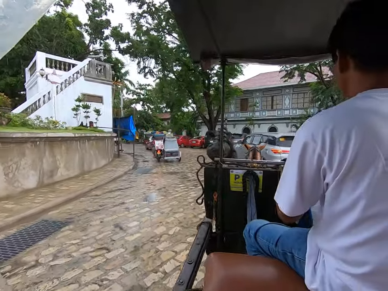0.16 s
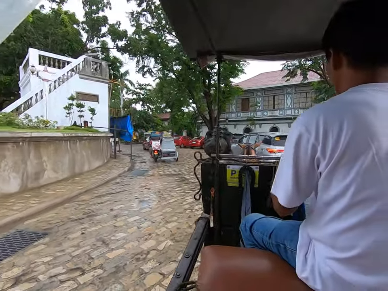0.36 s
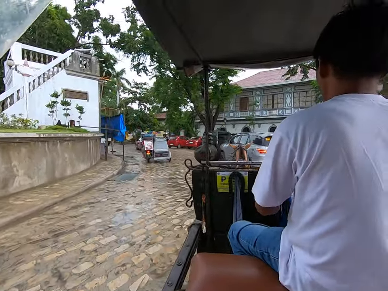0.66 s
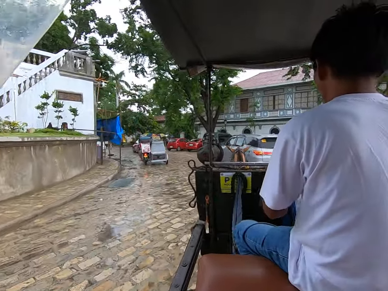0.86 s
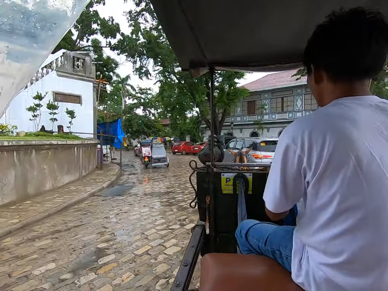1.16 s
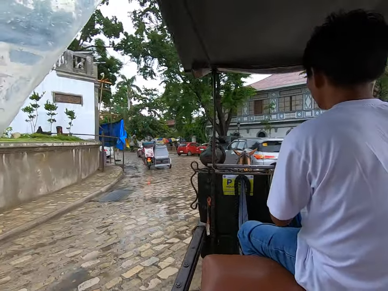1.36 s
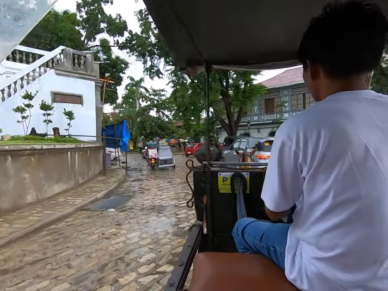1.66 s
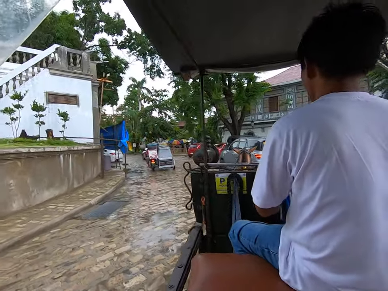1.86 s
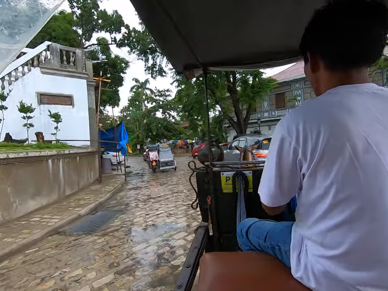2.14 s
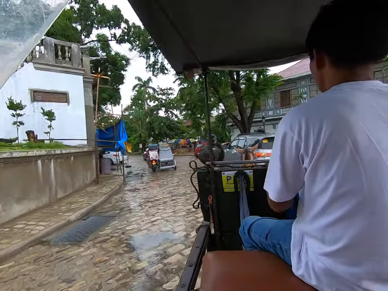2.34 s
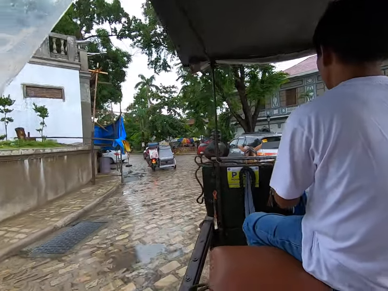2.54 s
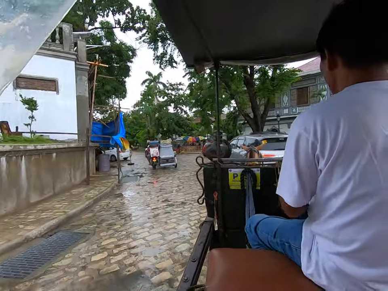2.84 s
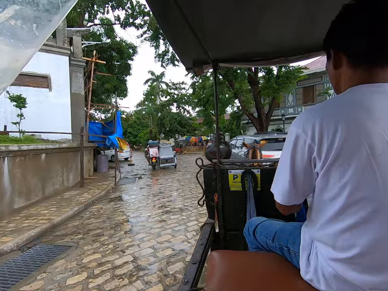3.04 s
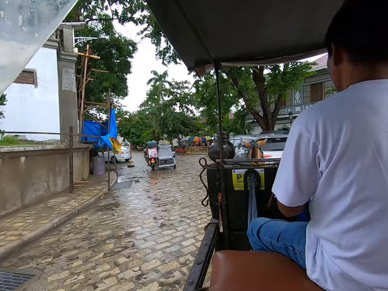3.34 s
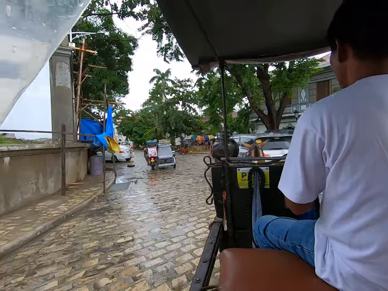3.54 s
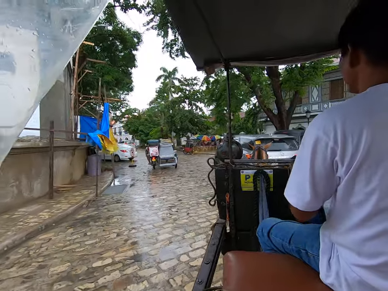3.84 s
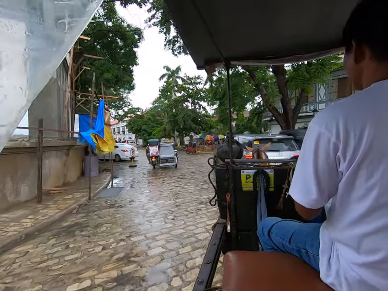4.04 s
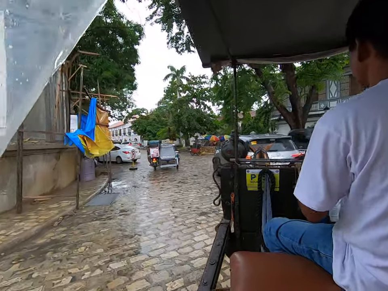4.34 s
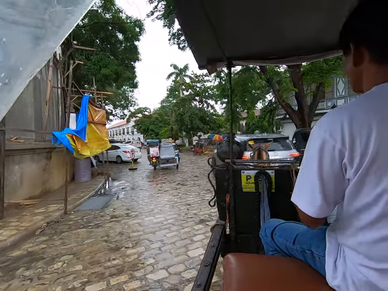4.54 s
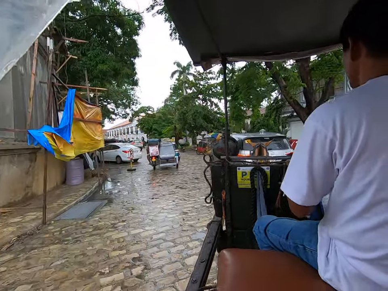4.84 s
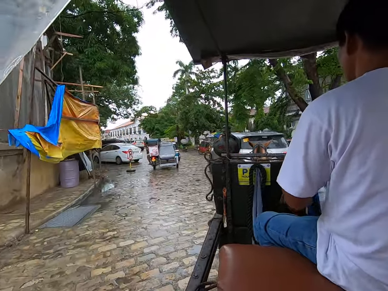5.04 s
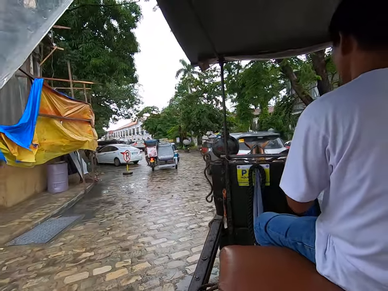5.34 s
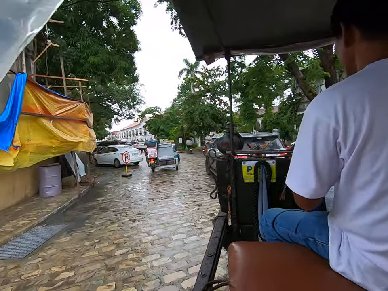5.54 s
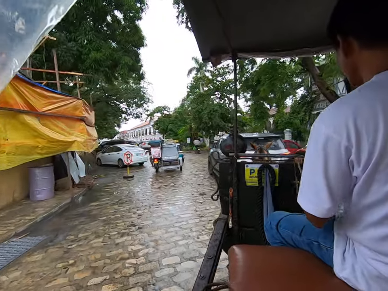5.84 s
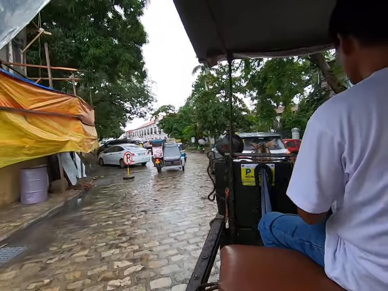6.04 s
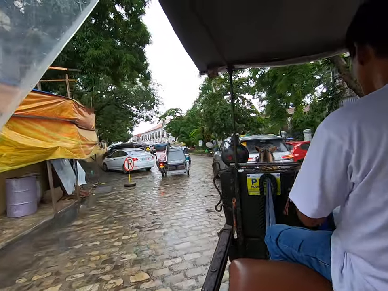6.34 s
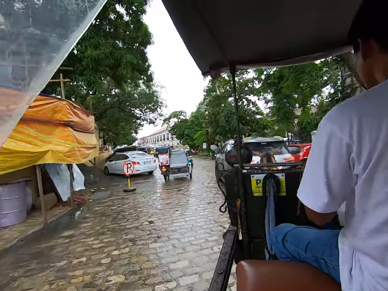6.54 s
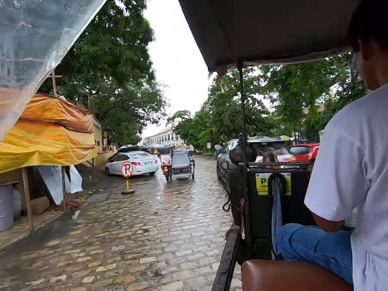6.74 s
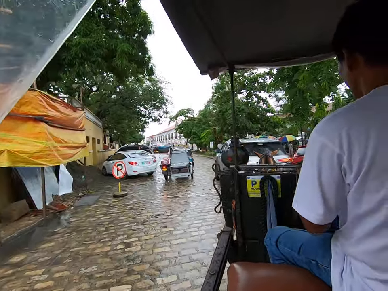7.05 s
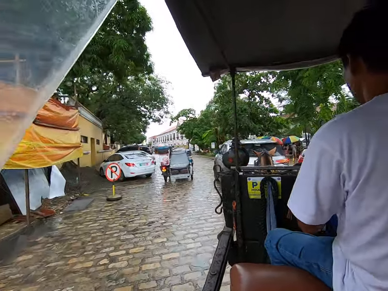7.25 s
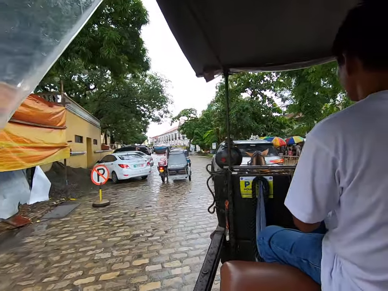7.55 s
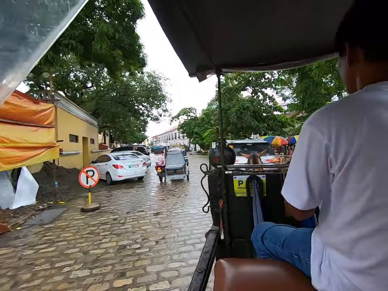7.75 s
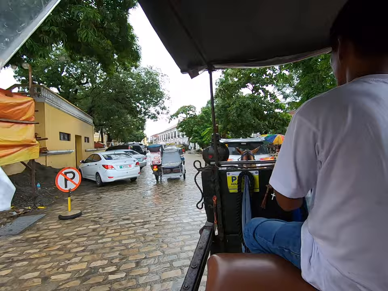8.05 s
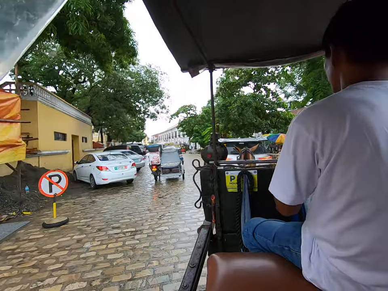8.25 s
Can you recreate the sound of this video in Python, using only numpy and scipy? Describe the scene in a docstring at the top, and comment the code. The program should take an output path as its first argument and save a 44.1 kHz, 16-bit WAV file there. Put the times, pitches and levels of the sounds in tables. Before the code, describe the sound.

A horse trots on a wet cobbled street for about eight seconds, heard from the seat of the cart it pulls. The hooves make hollow, damped clip-clops, a little over three a second, often in quick pairs and varying in strength. Underneath, the cart rumbles steadily and its boards rattle, with scattered wooden knocks, the stronger ones near 0.2, 4.2, 4.9 and 7.1 seconds. Water hisses and spits from the wheels, brightest in the first two seconds, with small splashes around 1.2 and 1.8 seconds. Metal fittings clink lightly, and the harness chain jingles faintly from about 3 to 5.3 seconds. The low pulsing exhaust of a motor tricycle ahead starts faint and slowly grows, strongest from about 6 seconds. The sound begins wide, narrows almost to mono by 3 seconds and partly reopens around 8.

```python
"""A wet cobbled street, heard from the seat of a two-wheeled cart behind a trotting horse.
Each hoof strikes a hollow, damped note from the stone, often in a quick pair. The cobbles force the
cart body to drone, rattle and knock; the harness clinks. Water hisses and spits, brightest in the
first seconds, and the periodic exhaust pulses of a motor tricycle ahead slowly grow louder.
The sound starts wide, narrows almost to mono after two seconds and partly reopens at the very end."""
import sys
import numpy as np
from scipy import signal
from scipy.fft import rfft, irfft
from scipy.io import wavfile
from scipy.ndimage import uniform_filter1d

SR = 44100
rng = np.random.default_rng(int(sys.argv[2]) if len(sys.argv) > 2 else 0)


def digitize_waveform(pressure):
    """Quantize a signal to 16-bit integers and store it at the path in sys.argv[1].

    Rows of a 2-D input are taken as channels; values are limited to [-1, 1].
    """
    field = np.atleast_2d(pressure).T
    bounded = np.clip(field, -1, 1)
    quanta = np.round(bounded * 32767).astype(np.int16)
    wavfile.write(sys.argv[1], SR, quanta)


N = 370440

# Levels are relative within each column; spectra give level per unit bandwidth.
# the trot, diagonal pairs landing almost together: t/s, note/dB, hollow pitch/Hz, crunch/dB, click/dB
HOOFBEATS = [(.213, -31, 1320, -26, -38), (.247, -29, 1017, -21.5, -25), (0.529, -28, 1420, -24, -28.5),
             (.549, -25.5, 1065, -36, -46), (0.852, -12, 1184, -26, -25.5), (1.101, -23, 1380, -23.5, -27),
             (1.119, -37, 1270, -27, -38), (1.392, -33, 1420, -24, -27), (1.426, -14, 1042, -25, -35),
             (1.69, -21, 1360, -20, -23), (1.715, -9.5, 1093, -24, -43), (1.972, -23, 1363, -25, -33),
             (2.008, -16.5, 1094, -18.5, -34), (2.278, -27, 1350, -28, -47), (2.291, -19.5, 998, -30, -43),
             (2.573, -31, 1350, -28.5, -53), (2.601, -25.5, 1023, -23, -38), (2.864, -27, 1530, -32, -39),
             (2.891, -8.5, 977, -27.5, -38), (3.162, -25, 1310, -32, -43), (3.193, -28, 1080, -32, -36),
             (3.455, -36, 1380, -31.5, -36), (3.492, -13, 1310, -20, -33), (3.511, -19, 1210, -38, -52),
             (3.738, -19.5, 1280, -30, -45), (3.78, -18.5, 1110, -25.5, -42), (4.044, -31, 1350, -27, -35),
             (4.064, -16, 1070, -25.5, -39), (4.348, -36, 1410, -30.5, -45), (4.37, -24.5, 1040, -30, -46),
             (4.638, -22.5, 1344, -31, -39), (4.663, -25, 1106, -30, -55), (4.952, -41, 1360, -28, -55),
             (4.978, -26, 1100, -26.5, -42), (5.263, -17, 1100, -30, -47), (5.581, -22.5, 1257, -27.5, -45),
             (5.859, -19, 1135, -31, -49), (5.876, -11.5, 1092, -28, -40), (6.162, -28, 1330, -43, -54),
             (6.19, -11, 1387, -22.5, -35), (6.482, -36, 1245, -29, -49), (6.777, -28, 1285, -28.5, -48),
             (6.809, -20, 1046, -28, -49), (7.094, -24, 1330, -27, -35), (7.114, -20, 1085, -30, -42),
             (7.419, -32, 1040, -28, -50), (7.724, -17.5, 1102, -20.5, -37), (8.033, -21.5, 1440, -21, -47),
             (8.32, -36, 1000, -29.5, -37)]
# modes of the hoof's cup: f/hollow pitch, level/dB, share of the ring time
HOOF_MODES = [(.66, -23.5, 0.82), (0.999, 1.5, 0.86), (1.14, -20, 1), (1.39, -23, 0.21), (2.752, -29, 0.88)]
# modes of iron shoe and stone: f/Hz, level/dB, t60/s
SHOE_MODES = [(712, -9, 0.038), (986, -5, 0.056), (1810, -8, 0.058), (2964, -9, .04)]
# spectrum of the shoe's click: f/Hz, level/dB
CLICK_SPECTRUM = [(600, 7), (1500, 10), (3300, 7), (5000, 3.5), (7500, -0.5), (10000, -10), (11500, -27),
                  (15500, -38)]
# spectrum of the shoe's crunch and scuff: f/Hz, level/dB
CRUNCH_SPECTRUM = [(500, -19.5), (800, -9.5), (1000, -2.5), (1300, 3), (1600, 1), (1950, -18.5),
                   (2400, -17), (3200, -10.5), (5000, -25)]
# reflections from dashboard and canopy: delay/s, left gain, right gain
CART_ECHOES = [(.0083, -.12, 0.29), (0.02, .22, 0.089), (0.024, .06, .18)]
# how hard the paving shakes the cart: t/s, drone/dB, rattle/dB, tyre hiss/dB
SHAKING = [(0, -27.5, -41.5, -37), (.25, -23, -38, -34.5), (1.1, -24, -38.5, -35.5),
           (1.8, -23.5, -39.5, -35), (2.1, -29.5, -44.5, -40.5), (2.45, -22, -35.5, -38),
           (3.25, -21.5, -38.5, -40), (3.9, -23, -37, -40.5), (4.95, -21, -37, -38), (5.7, -21.5, -39, -38),
           (6.251, -20, -36, -37), (6.7, -25.5, -38, -35), (7.5, -21.5, -37.5, -35),
           (8.4, -23.5, -38.5, -35)]
# spectrum of the cart body: f/Hz, level/dB
DRONE_SPECTRUM = [(15, -22), (28, -7), (42, -8.5), (52, -8), (70, -2.5), (95, -1.5), (114, -1.5),
                  (138, -0.5), (172, -15), (245, -16.5), (340, -25.5), (600, -62)]
# spectrum of the boards: f/Hz, level/dB
RATTLE_SPECTRUM = [(120, -46), (220, 8), (290, 4.5), (350, -4), (470, 3.5), (650, -2.5), (800, -6.5),
                   (1100, -4.5), (1500, -12.5), (2100, -21.5), (4000, -43)]
# spectrum of the tyres on wet stone: f/Hz, level/dB
HISS_SPECTRUM = [(500, 1), (1200, 6.5), (2200, 2.5), (3000, 3), (3900, -1), (4800, -9), (5600, -20.5),
                 (8200, -17), (11000, -30), (13000, -27), (15000, -47)]
# spectrum of the wheel spray: f/Hz, level/dB
SPRAY_SPECTRUM = [(700, -10), (2000, 0.5), (4500, 6), (6300, 6), (8200, -1), (10000, -4), (11300, -13.5),
                  (13500, -35), (15700, -31)]
# the cart jolts on a stone: t/s, level/dB, f/Hz
JOLTS = [(0.194, -15, 106), (0.656, -20, 268), (1.155, -22.5, 289), (1.841, -21.5, 399), (2.599, -21, 277),
         (2.805, -25.5, 264), (3.279, -18.5, 294), (3.299, -19.5, 253), (4.2, -13.5, 262.6),
         (4.484, -19.5, 271), (4.916, -12, 136), (5.225, -25.5, 427), (5.365, -28.5, 448),
         (6.321, -23.5, 413), (6.362, -16.5, 296), (7.107, -15.5, 315), (7.241, -22.5, 424),
         (7.883, -26.5, 462)]
# modes of the wooden panels: f/jolt pitch, level/dB, t60/s
PANEL_MODES = [(.72, -0.5, 0.075), (1.0, 6, 0.042), (1.371, -6.5, 0.063), (1.8, -1, 0.026),
               (2.6, -11, 0.042)]
# brightness of the spray hiss and hoof clicks, highest in the first seconds: t/s, brightness/dB
BRIGHTNESS = [(0, -7), (.17, -3.5), (.37, 0.5), (.6, -5.5), (.72, -0.5), (.95, -4.5), (1.35, 1.5),
              (1.5, -2), (1.67, 2.5), (1.85, -2.5), (2.0, -1), (2.1, -6), (2.3, -8), (2.55, -18.5),
              (3.0, -11), (3.13, -22), (3.27, -8.5), (3.4, -19), (3.6, -17), (4.55, -16), (4.9, -10.5),
              (5.3, -8), (5.7, -19.5), (6.15, -11.5), (6.7, -19.5), (7.3, -13.5), (8.15, -19), (8.4, -8)]
# a wheel runs through a puddle: t/s, level/dB
PUDDLES = [(.375, -28), (1.128, -34), (1.154, -20.5), (1.204, -27), (1.293, -36), (1.835, -24.5),
           (2.168, -33), (2.361, -28), (3.22, -34.5), (3.558, -36), (3.896, -30), (4.195, -32),
           (4.702, -31.5), (7.095, -29)]
# spectrum of thrown droplets: f/Hz, level/dB
DROPLET_SPECTRUM = [(800, -5), (2000, 11.5), (4500, 4), (10000, -4), (11300, -13), (14000, -23),
                    (15500, -37)]
# short sharp ticks and snaps, each around one pitch: t/s, level/dB, f/Hz
SNAPS = [(1.153, -22, 4700), (1.835, -28, 8950), (2.167, -28, 6160), (3.558, -34, 4000), (4.195, -36, 7540),
         (4.199, -30, 3100), (4.69, -30, 3050), (5.003, -29, 3560), (5.288, -33, 3550),
         (5.484, -31.5, 3370), (5.602, -29.5, 3450)]
# metal fittings of harness and cart are struck: t/s, level/dB, f/Hz, t60/s
CLINKS = [(.075, -32, 3460, .04), (.612, -30, 3800, .05), (1.118, -27, 3650, .04), (1.664, -30, 3950, 0.06),
          (1.717, -30, 3000, .06), (2.379, -35, 9080, 0.057), (2.42, -38, 7060, 0.035),
          (6.322, -47, 8900, 0.043), (6.36, -51, 9300, .03), (3.523, -33.5, 3490, 0.1),
          (6.659, -51, 4190, 0.52), (7.0, -48, 4170, .6), (7.28, -54, 4190, .6), (8.052, -47.5, 3160, 0.94)]
# the harness chain is shaken: t/s, level/dB
CHAIN_SHAKES = [(2.99, -46), (3.457, -42), (3.485, -47), (3.57, -55), (3.63, -46), (3.745, -51),
                (3.815, -43), (3.852, -41), (3.897, -41), (3.985, -42), (4.055, -44), (4.128, -47),
                (4.39, -50), (4.755, -48), (4.845, -44), (4.893, -42), (5.175, -42), (5.235, -45),
                (5.325, -45)]
# modes of a chain link: f/Hz, level/dB, t60/s
LINK_MODES = [(3380, -11, 0.041), (3800, 3, 0.051), (4620, -2, 0.046), (5180, -4, 0.071)]
# the tricycle's single-cylinder engine: t/s, exhaust/dB, valve tick/dB
ENGINE_LEVELS = [(0, -36, -55), (2.4, -26.5, -58.5), (4.7, -23.5, -55), (5.1, -22, -56),
                 (5.8, -22.5, -56.5), (6.05, -20.5, -49), (6.7, -21, -53.5), (7.1, -21, -50),
                 (7.5, -23, -51.5), (7.85, -22, -47.5), (8.4, -20, -53)]
# engine speed: t/s, firing rate/Hz
FIRING_RATE = [(0, 17.9), (2.4, 20.4), (4.7, 19.4), (5.1, 22.4), (5.56, 22.1), (6.05, 22.45), (6.6, 22.75),
               (7.0, 23.2), (7.4, 23.2), (7.7, 22.2), (8.0, 20.8), (8.4, 19)]
# harmonics of the exhaust: f/firing rate, level/dB
EXHAUST_HARMONICS = [(2, -17), (3, -17.5), (4, -10), (5, -1), (6, 0), (7, -9), (8, -20.5), (10, -19.5),
                     (11, -18.5)]
# reverberation time of the street: f/Hz, t60/s
STREET_DECAY = [(200, 0.26), (1100, 0.2), (4000, 0.32), (12000, 0.49)]
# likeness of the left and right noise: f/Hz, correlation
COHERENCE = [(30, .93), (130, .95), (300, .86), (600, .55), (1200, .33), (3000, .55), (5800, .2),
             (10000, 0)]
# balance of the noise: f/Hz, left minus right/dB
BALANCE = [(30, .4), (3300, .2), (5800, -1.5), (10000, 3.5), (13000, 5.5)]
# change of stereo width, before weighting by band: t/s, width/dB
WIDTH = [(0, 0), (2.25, 0), (2.75, -9), (3.1, -26), (3.5, -40), (7.8, -40), (8.05, -14), (8.4, -8)]
# weight of the width change in each band: f/Hz, factor on width/dB
WIDTH_WEIGHT = [(30, 2.0), (300, 1.6), (1200, 1.1), (4000, .8), (5500, .5), (9500, .5), (11000, .2),
                (12000, 0)]


def hooves():
    """Impact excitation: the shoe clicks and crunches, and the hoof's cup rings in damped modes."""
    out, t = np.zeros((2, N)), np.arange(8192) / SR
    ring_cycles, scuff_lead_s, heel_lag_s, dull_above_hz = 44, .02, .0042, 4200
    weak_modes = [level < -4 for _, level, _ in HOOF_MODES]
    crack = gain_of(.5) * np.exp(-t / .0023)  # the first instant of iron on stone
    click_envelope = (np.exp(-t / .011) + crack) * np.minimum(t / .0007, 1)
    for s, db, hz, crunch_db, click_db in HOOFBEATS:
        t60 = ring_cycles / hz  # constant Q: higher notes die sooner
        detune = 1 + .034 * rng.standard_normal(len(HOOF_MODES)) * weak_modes
        note = sum(gain_of(level) * ring(t, hz * ratio * d, t60 * share, rise=.0016)
                   for (ratio, level, share), d in zip(HOOF_MODES, detune))
        note *= 1 + .35 * flutter(len(t), size=70) * np.minimum(t / .008, 1)  # the shoe chatters
        note = note + [[.7], [-.7]] * signal.hilbert(note).imag  # left and right differ in phase
        shoe = sum(gain_of(level) * ring(t, f * rng.uniform(1, 1.04), shoe_t60, rise=.001)
                   for f, level, shoe_t60 in SHOE_MODES)
        # wheels and paving scatter the note back
        scatter = ring(t, hz, t60=.11, rise=.006) * [flutter(len(t), size=130) for _ in range(2)]
        tilt_db_per_octave = .3 * min(brightness(s), 0)  # the click dulls as the hiss fades
        spectrum = [(f, level + tilt_db_per_octave * np.log2(max(f / dull_above_hz, 1)))
                    for f, level in CLICK_SPECTRUM]
        click = coloured(rng.standard_normal((2, len(t))), spectrum) * click_envelope
        crunch, scuff = scrape(t, decay_s=.012), scrape(t, decay_s=.025)
        blow = gain_of(db + 1) * note + gain_of(click_db - .5) * click
        blow += gain_of(crunch_db - 2.5) * (crunch + shoe)
        add(out, s - scuff_lead_s, gain_of(crunch_db - 12) * scuff)  # the toe grazes first
        add(out, s, blow + gain_of(db - 19) * scatter)
        add(out, s + round(heel_lag_s * hz) / hz, gain_of(db - 9) * note)  # the heel lands in phase
        for delay, left, right in CART_ECHOES:  # the paths change with where the hoof lands
            add(out, s + delay * rng.uniform(.85, 1.15), blow * [[left], [right]])
    return out


def scrape(t, decay_s):
    """Friction of a shoe on stone radiates a burst of rough noise that decays exponentially."""
    noise = coloured(rng.laplace(size=(2, len(t))), CRUNCH_SPECTRUM)
    return noise * np.exp(-t / decay_s) * np.minimum(t / .00028, 1)


def rolling_cart():
    """Forced vibration: the same bumps modulate body drone, board rattle, tyre hiss and spray."""
    t = np.arange(N) / SR
    s, *levels = np.transpose(SHAKING)
    drone_db, rattle_db, hiss_db = (np.interp(t, s, level) for level in levels)
    bumps = wander(per_s=23)
    bright_db = brightness(t) + 1.2 * wander(per_s=14)  # the treble flickers
    body = coloured(rng.standard_normal((2, N)), DRONE_SPECTRUM)
    body /= np.sqrt(uniform_filter1d(body[0] ** 2, size=6000))  # the even run of stones steadies it
    boards = patchy(grains(per_s=2700, spread_db=1), depth_db=2.5, size=3)
    tyres = patchy(grains(per_s=9000, spread_db=-.4), depth_db=2, size=4)
    spray = patchy(grains(per_s=9000, spread_db=2.5), depth_db=2.8, size=4)
    return (body * gain_of(drone_db + 1.1 * bumps)
            + coloured(boards, RATTLE_SPECTRUM) * gain_of(rattle_db + 1.5 + 1.74 * bumps)
            + coloured(tyres, HISS_SPECTRUM) * gain_of(hiss_db + .26 * bright_db + 1.24 * bumps)
            + coloured(spray, SPRAY_SPECTRUM) * gain_of(-42 + bright_db + 1.8 * bumps))


def panel_knocks():
    """Free vibration: wooden panels ring at each jolt, and again as the body drops on its springs."""
    out, t = np.zeros((2, N)), np.arange(8192) / SR
    rebound_s, rebound_db = .019, -9
    for s, db, hz in JOLTS:
        for at, blow_db in (s, db), (s + rebound_s, db + rebound_db):
            detune = rng.uniform(.914, 1.032, len(PANEL_MODES))
            knock = sum(gain_of(level) * ring(t, hz * ratio * d, t60, rise=.0065)
                        for (ratio, level, t60), d in zip(PANEL_MODES, detune))
            add(out, at, gain_of(blow_db + 6.5) * knock)
    return out


def splashes():
    """Shot noise of droplets thrown by wheels in puddles and by hooves; the latter fade with the hiss."""
    envelope, t = np.zeros((1, N)), np.arange(16384) / SR
    t60, rise_s = .1, .005
    hoof_splashes = [(s, -31 + .8 * brightness(s)) for s, *_ in HOOFBEATS]
    for s, db in hoof_splashes + list(PUDDLES):
        add(envelope, s, gain_of(db - 60 * t / t60) * (1 - np.exp(-t / rise_s)))
    return gain_of(-2) * envelope * coloured(grains(per_s=6700, spread_db=3.5), DROPLET_SPECTRUM)


def snaps():
    """Band-limited transients: short sharp ticks and snaps, each a noise burst around one pitch."""
    out, t = np.zeros((2, N)), np.arange(2048) / SR
    band_ratio, decay_s = 1.2, .0025
    for s, db, hz in SNAPS:
        band = [(hz / 4, -26), (hz / band_ratio, -10), (hz, 0), (hz * band_ratio, -10), (hz * 2, -30)]
        noise = coloured(rng.standard_normal((2, len(t))), band)
        add(out, s, gain_of(db) * noise * np.exp(-t / decay_s))
    return out


def fitting_clinks():
    """Beating: small metal fittings ring in a close pair of modes, and chatter as they do."""
    out, t = np.zeros((2, N)), np.arange(16384) / SR
    for s, db, hz, t60 in CLINKS:
        lower = ring(t, hz, t60, rise=.001)
        upper = ring(t, hz * rng.uniform(1.01, 1.04), t60 / 2, rise=.001)
        chatter = 1 + flutter(len(t), size=110) / 2
        add(out, s, gain_of(db) * (lower + .5 * upper) * chatter)
    return out


def harness_chain():
    """Modal superposition: at each shake three links strike in turn, each with its own mix of modes."""
    out, t = np.zeros((2, N)), np.arange(8192) / SR
    for s, db in CHAIN_SHAKES:
        for delay in np.cumsum(np.r_[0, rng.uniform(.004, .013, size=2)]):
            for hz, level, t60 in LINK_MODES:
                strength = gain_of(db + level) * rng.standard_normal((2, 1))
                add(out, s + delay, strength * ring(t, hz * rng.uniform(.955, 1.04), t60, rise=.0012))
    return out


def tricycle():
    """Periodic excitation: the firings make a harmonic exhaust note; a valve ticks once a cycle."""
    t, age = np.arange(N) / SR, np.arange(2048) / SR
    valve_hz, tick_at_s = 3720, 6.23
    s, exhaust_db, tick_db = np.transpose(ENGINE_LEVELS)
    cycles = np.cumsum(np.interp(t, *np.transpose(FIRING_RATE))) / SR
    cycles -= np.interp(tick_at_s, t, cycles)
    uneven_cycles = cycles + .02 * wander(per_s=5)  # the burn comes a little early or late
    exhaust = sum(gain_of(db) * np.sin(2 * np.pi * (k * uneven_cycles + rng.random()))
                  for k, db in EXHAUST_HARMONICS)
    ticks = np.zeros((2, N))
    for at in t[1:][np.diff(np.floor(cycles)) > 0]:
        valve = ring(age, valve_hz * (1 + .025 * rng.standard_normal()), t60=.032, rise=.003)
        chatter = uniform_filter1d(flutter(len(age), size=48), size=36)
        db = np.interp(at, s, tick_db) + 2.1 * rng.standard_normal()
        add(ticks, at, gain_of(db) * evened(valve * chatter))
    return gain_of(np.interp(t, s, exhaust_db)) * evened(exhaust) + ticks


def street_reverberation(sound):
    """Reverberation: sparse reflections from walls and paving, each band decaying at its own rate."""
    taps = np.zeros((2, SR // 2))
    slots = np.arange(400, SR // 2 - 20, 20)
    arrivals = slots + rng.integers(0, 20, (2, len(slots)))
    np.put_along_axis(taps, arrivals, rng.choice([-1., 1.], arrivals.shape), 1)
    hz, t, bands = signal.stft(taps, SR, nperseg=256)
    decay = gain_of(-60 * t / at_frequency(STREET_DECAY, hz)[:, None])
    tail = signal.istft(bands * decay, SR, nperseg=256)[1]
    return signal.fftconvolve(sound, tail / np.linalg.norm(tail[0]), axes=1)[:, :N]


def brightness(s):
    """Brightness of the spray hiss and hoof clicks in dB, interpolated at time s."""
    return np.interp(s, *np.transpose(BRIGHTNESS))


def ring(t, hz, t60, rise):
    """A damped oscillator: one mode that builds up and decays exponentially."""
    return np.sin(2 * np.pi * hz * t) * gain_of(-60 * t / max(t60, .004)) * (1 - np.exp(-t / rise))


def grains(per_s, spread_db):
    """Shot noise: two Poisson trains of tiny impacts of random size."""
    sizes = gain_of(spread_db * np.minimum(rng.exponential(1, (2, N)), 4))
    return evened(sizes * rng.standard_normal((2, N)) * (rng.random((2, N)) < per_s / SR))


def patchy(pair, depth_db, size):
    """Random modulation: narrow bands swell and fade as different parts are shaken."""
    bands = signal.stft(pair, nperseg=512, noverlap=384)[2]
    swell = uniform_filter1d(rng.standard_normal(bands.shape[1:]), size, axis=0)
    swell = evened(uniform_filter1d(swell, 2 * size, axis=1))
    return signal.istft(bands * gain_of(depth_db * swell), nperseg=512, noverlap=384)[1][:, :N]


def coloured(pair, spectrum):
    """Partial coherence: two independent noises mix into left and right and take on a spectrum."""
    size = pair.shape[1]
    hz = np.fft.rfftfreq(size, 1 / SR)
    mid, side = rfft(pair)
    correlation = at_frequency(COHERENCE, hz)
    side *= np.sqrt((1 - correlation) / (1 + correlation))
    lean = gain_of(at_frequency(BALANCE, hz) / 2)
    roll_off = np.maximum(hz / spectrum[-1][0], 1) ** 2
    shape = gain_of(at_frequency(spectrum, hz)) / roll_off
    return evened(irfft(np.array([(mid + side) * lean, (mid - side) / lean]) * shape, size))


def wander(per_s):
    """Low-passed noise: a slow fluctuation of unit RMS."""
    hz = np.fft.rfftfreq(N, 1 / SR)
    return evened(irfft(rfft(rng.standard_normal(N)) / (1 + (hz / per_s) ** 4), N))


def flutter(count, size):
    """A moving average of noise: the quick chatter of a loose or scattered ring."""
    return evened(uniform_filter1d(rng.standard_normal(count), size))


def gain_of(db):
    """Amplitude ratio of a level in dB."""
    return 10 ** (np.asarray(db) / 20)


def evened(x):
    """Normalisation to unit RMS."""
    return x / np.sqrt(np.mean(x ** 2) + 1e-20)


def at_frequency(points, hz):
    """Interpolation along a logarithmic frequency axis."""
    f, value = np.transpose(points)
    return np.interp(np.log(hz + 1), np.log(f + 1), value)


def add(mix, s, sound):
    """Superposition of a sound on the mix at time s."""
    part = mix[:, max(round(s * SR), 0):][:, :sound.shape[-1]]
    part += sound[..., :part.shape[1]]


def scene():
    """Superposition of horse, cart and tricycle; hooves, snaps and chain also reverberate."""
    impacts = hooves() + snaps() + harness_chain()
    direct = impacts + rolling_cart() + tricycle() + fitting_clinks() + panel_knocks() + splashes()
    return direct + gain_of(-6.5) * street_reverberation(impacts)


def record(dry):
    """Mid-side weighting narrows and partly reopens the image, most in the bass; a low-pass follows."""
    mid, side = dry.mean(0), (dry[0] - dry[1]) / 2
    hz, s, bands = signal.stft(side, SR, nperseg=1024)
    bands *= gain_of(at_frequency(WIDTH_WEIGHT, hz)[:, None] * np.interp(s, *np.transpose(WIDTH)))
    side = signal.istft(bands, SR, nperseg=1024)[1][:N]
    width_db = np.interp(np.arange(N) / SR, *np.transpose(WIDTH))
    presence = signal.sosfiltfilt(signal.butter(2, [5200, 7400], "band", fs=SR, output="sos"), mid)
    mid -= presence * gain_of(-5.5) * (1 - gain_of(width_db / 2))  # the narrow sound is a little duller
    low_pass = signal.firwin(511, cutoff=15500, window=("kaiser", 9), fs=SR)
    return signal.oaconvolve(np.array([mid + side, mid - side]), low_pass[None], "same")


dry = scene()
out = record(dry)
digitize_waveform(out)
```